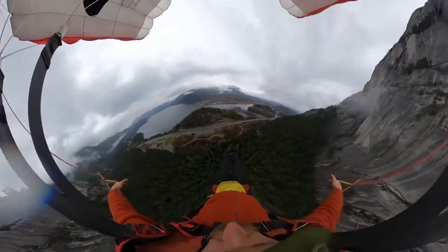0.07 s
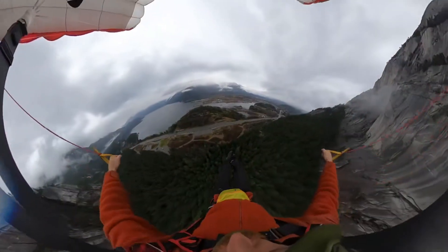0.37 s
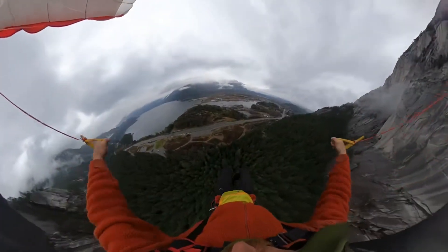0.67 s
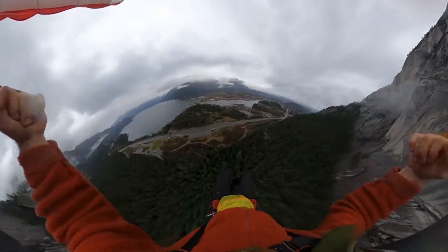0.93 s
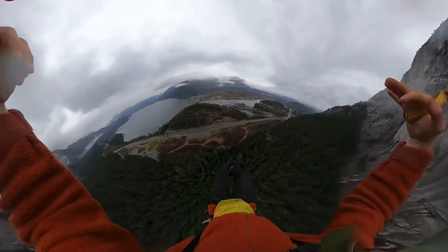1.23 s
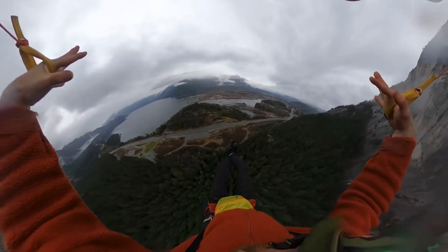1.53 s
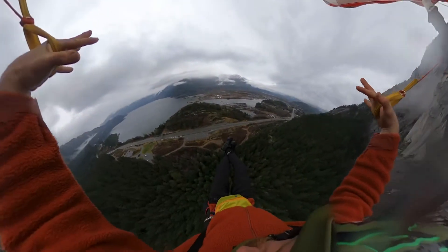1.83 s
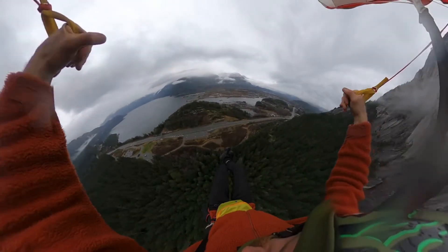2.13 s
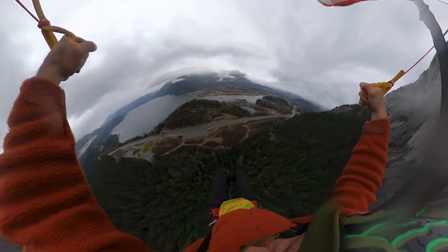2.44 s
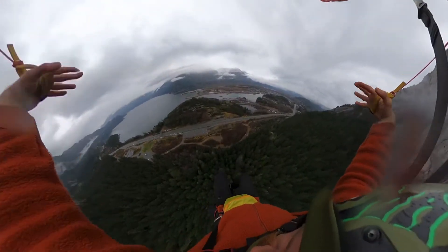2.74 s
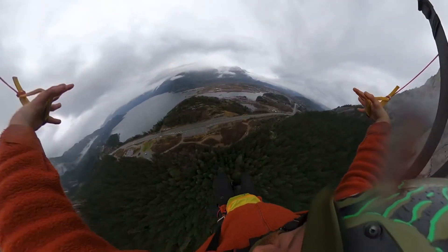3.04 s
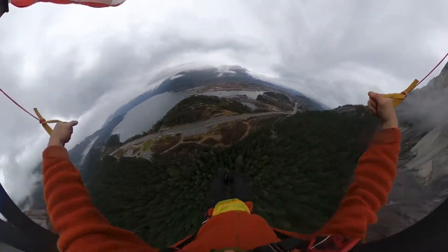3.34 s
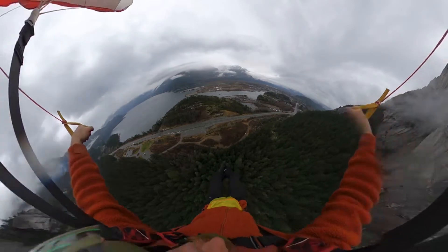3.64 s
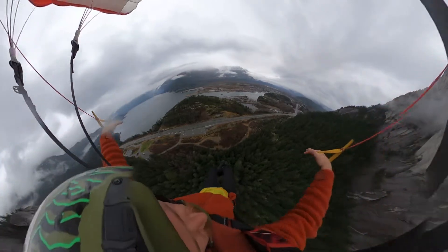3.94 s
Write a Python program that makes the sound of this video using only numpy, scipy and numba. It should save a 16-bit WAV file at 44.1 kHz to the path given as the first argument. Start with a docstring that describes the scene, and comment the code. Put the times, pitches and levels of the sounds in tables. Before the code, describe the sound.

Wind buffets a body-worn microphone throughout a parachute glide, a low, uneven rumble with soft thumps and rushing, hissing air. From about 1.1 to 1.5 seconds, sleeves and steering lines rustle and snap lightly. The rush gradually builds. At about 3.7 seconds, a snap and a strong gust hit the microphone, the loudest moment, followed by faint, high, breathy whistling just before 4 seconds.

```python
"""Wind on a body-worn camera during a canopy glide beside a cliff.
From the start, eddies buffet the microphone and air rushes and hisses over the gear, with a faint
hollow ring at first. From 1.1 to 1.5 s, sleeves and steering toggles rustle and snap as the arms rise.
The rush builds; at 3.7 s a gust tears across the port, followed by high, breathy whistles."""
import sys
import numpy as np
from scipy import signal
from scipy.fft import rfft, irfft
from scipy.io import wavfile
from scipy.ndimage import uniform_filter1d
from numba import njit

SR = 44100
rng = np.random.default_rng(int(sys.argv[2]) if len(sys.argv) > 2 else 0)


def to_wav(sig):
    """Store sig (one row per channel, or 1-D mono) as 16-bit WAV at the path in sys.argv[1].

    Samples outside -1..1 are clipped; the rate is SR.
    """
    pcm = np.clip(np.atleast_2d(sig), -1, 1) * 32767
    pcm = np.round(pcm).astype(np.int16)
    wavfile.write(sys.argv[1], SR, pcm.T)  # frames by channels


N = 176400

# envelopes of mic buffeting, air rush, treble hiss: t/s, level/dB
BUFFET_DB = [(0, -28.5), (.11, -28), (.25, -33), (.6, -33.5), (.68, -35), (.82, -33.5), (1.0, -34),
             (1.09, -29.5), (1.17, -34.5), (1.25, -27), (1.33, -31), (1.48, -26), (1.68, -26.5),
             (1.78, -30.5), (1.86, -28.5), (2.17, -30.5), (2.44, -27.5), (2.49, -27.5), (2.55, -22.5),
             (2.66, -25.5), (2.92, -28), (3.1, -25), (3.28, -29), (3.45, -29), (3.55, -26), (3.63, -29),
             (3.74, -18), (3.86, -23), (3.91, -13), (4, -17.5)]
RUSH_DB = [(0, -52), (.35, -56.5), (.7, -52.5), (1.0, -48.5), (1.35, -45.5), (1.58, -47), (1.7, -44.5),
           (2.0, -45), (2.7, -43.5), (3.4, -43.5), (3.66, -40.5), (3.85, -35.5), (3.9, -39), (4, -38)]
HISS_DB = [(.11, -83), (.17, -71.5), (.75, -73), (1.2, -69.5), (1.6, -67), (2.02, -61), (2.2, -64.5),
           (2.32, -69.5), (2.6, -63), (2.8, -63.5), (2.97, -68), (3.2, -60.5), (3.5, -63.5), (3.66, -61.5),
           (3.78, -53), (3.88, -58.5), (4, -56)]
# source noise spectra: f/Hz, relative density/dB
BUFFET_SPECTRUM = [(10, -6), (28, 1), (48, 0.5), (70, -3), (115, -3), (200, -2), (600, 3.5)]
RUSH_SPECTRUM = [(80, -5.5), (200, 5.5), (330, 0.5), (550, -1), (760, -3.5), (1050, -5), (1600, -12),
                 (2200, -19.5), (3500, -33.5), (8000, -63.5), (12000, -77)]
HISS_SPECTRUM = [(900, 0), (2000, 1.5), (2800, 2.5), (3600, -1.5), (4500, -2.5), (6500, -9), (8500, -17),
                 (12000, -27), (15500, -50.5)]
TICK_SPECTRUM = [(3500, 0), (6000, -3), (10000, -13), (13000, -28)]
SLEEVE_SPECTRUM = [(150, 3), (380, 26.5), (900, -5), (1800, 1), (3800, -13.5), (6000, -15), (10000, -29),
                   (15000, -50)]
GUST_SPECTRUM = [(50, -12), (200, 5), (420, -0.5), (700, -5), (1000, -8.5), (1450, -15.5), (2000, -28),
                 (4000, -42), (9000, -60), (15000, -66)]
# air over lines and gear: t/s, half length/s, f/Hz, width/Hz, level/dB
GEAR_WHISTLES = [(0.31, 0.17, 546, 140, -61.5), (0.48, 0.14, 1150, 210, -61.5), (0.2, 0.5, 1770, 210, -71),
                 (0.089, 0.24, 2870, 750, -73.5), (.03, .1, 4100, 3900, -69),
                 (3.94, 0.078, 2730, 1400, -53.5), (3.94, 0.12, 4320, 1300, -55.5),
                 (3.95, 0.089, 6400, 1400, -67.5)]
# single large eddies: t/s, peak/dB, f/Hz, half length/s
EDDY_THUMPS = [(0.015, -22, 61, 0.03), (0.462, -22, 89, 0.0064), (.793, -23, 70, 0.003),
               (1.058, -24, 58, 0.0079), (1.497, -23.5, 57, 0.01), (2.422, -19, 60.5, 0.014),
               (2.742, -30, 88, 0.026), (3.553, -18, 59, 0.014), (3.778, -15, 395, 0.0022),
               (3.812, -14.5, 215, 0.0053)]
# cloth and line snaps: t/s, peak/dB, f/Hz, width/oct, lag of lows/cycles, tick level/dB before a 0.5 gain
TAUT_SNAPS = [(.1262, -46.5, 850, 1, 2.4, -64), (1.2945, -40, 480, 1.15, 2.4, -58),
              (1.376, -31, 640, .85, 2.2, -51), (1.415, -33.5, 900, .95, 1.2, -49),
              (1.4628, -30.5, 700, .8, 2.3, -56), (3.7028, -16.5, 580, .55, 1.6, -62)]
# steering line slips: t/s, level/dB, f/Hz
LINE_SCRAPES = [(1.1355, -67, 5300), (1.2315, -60.5, 3950), (1.2495, -62.5, 3850), (1.274, -60.5, 4000)]
# sleeve rubs: t/s, half length/s, level/dB
SLEEVE_RUSTLES = [(1.284, 0.045, -46), (1.438, 0.066, -50.5)]
# gust blasts: onset/s, pre-filter level/dB, attack/s, decay/s, initial cut-off above floor/Hz
GUST_BLASTS = [(3.675, -36.5, 0.039, .022, 3980), (3.717, -20, 0.047, 0.015, 4200),
               (3.77, -19.5, 0.024, .022, 398), (3.813, -25.5, 0.0086, 0.037, 3400)]


def undb(db):
    """Decibels to gain."""
    return 10 ** (np.asarray(db) / 20)


def unit(x):
    """Scale to rms 1."""
    return x / np.sqrt(np.mean(x ** 2))


def seconds():
    """Sample times."""
    return np.arange(N) / SR


def freqs():
    """Bin frequencies, 1 Hz minimum."""
    return np.maximum(np.arange(N // 2 + 1) * SR / N, 1)


def curve(rows):
    """Gain along t/s, level/dB points."""
    return undb(np.interp(seconds(), *np.array(rows).T))


def swell(at_s, half_s):
    """Gaussian envelope, 1/e at +-half_s."""
    return np.exp(-((seconds() - at_s) / half_s) ** 2)


def walk(rate_hz):
    """Random sample-and-hold, smoothed twice, rms 1."""
    hold = max(int(SR / rate_hz), 2)
    held = np.repeat(rng.standard_normal(N // hold + 1), hold)
    return unit(uniform_filter1d(uniform_filter1d(held, hold), hold)[:N])


def noise(spectrum):
    """Noise shaped by f/Hz, density/dB points, rms 1."""
    hz, db = np.array(spectrum).T
    gain = undb(np.interp(np.log(freqs()), np.log(hz), db))
    return unit(irfft(rfft(rng.standard_normal(N)) * gain, N))


def ring(hz, width_hz):
    """Noise in one steep-sided resonance, rms 1."""
    f = freqs()
    detune = (f / hz - hz / f) * hz / width_hz
    return unit(irfft(rfft(rng.standard_normal(N)) / (1 + .5 * detune ** 2) ** 2, N))


@njit
def lowpass(x, cutoff_hz):
    """Two-pole low-pass, moving cut-off."""
    y, band_state, low_state = np.empty(len(x)), 0., 0.
    for i in range(len(x)):
        g = np.tan(np.pi * cutoff_hz[i] / SR)
        band = (band_state + g * (x[i] - low_state)) / (1 + g * (g + 1.2))
        y[i] = low_state + g * band
        band_state, low_state = 2 * band - band_state, 2 * y[i] - low_state
    return y


def buffeting(cruise_edge_hz=129.9, cruise_db=-40.5, oct_per_db=.04, shove_s=.09, flutter_db=1.5):
    """Large eddies shove the microphone unevenly; brighter in faster air."""
    shift_oct = oct_per_db * (20 * np.log10(curve(RUSH_DB)) - cruise_db)
    edge_hz = cruise_edge_hz * 2 ** shift_oct
    shoves = lowpass(lowpass(noise(BUFFET_SPECTRUM), edge_hz), edge_hz)
    levelled = shoves / np.sqrt(uniform_filter1d(shoves ** 2, int(shove_s * SR)))
    return unit(levelled * undb(flutter_db * walk(rate_hz=28.08))) * curve(BUFFET_DB)


def eddies(flow, depth_db, rate_hz):
    """Each octave of a flow flickers independently."""
    spectrum, octave = rfft(flow), np.log2(freqs())
    bands = (irfft(spectrum * np.maximum(1 - abs(octave - k), 0), N) for k in range(3, 15))
    return unit(sum(band * undb(-depth_db * walk(rate_hz)) for band in bands))


def airstream(rush_flutter_db=.34, hiss_flutter_db=1.1):
    """Small eddies rush and hiss with a common flutter."""
    flutter = walk(rate_hz=70)
    flow = eddies(noise(RUSH_SPECTRUM), depth_db=1.57, rate_hz=21.58)
    rush = flow * undb(rush_flutter_db * flutter) * curve(RUSH_DB)
    hiss = noise(HISS_SPECTRUM) * undb(hiss_flutter_db * flutter) * curve(HISS_DB)
    return rush + hiss


def whistles():
    """Broad resonances, sounding while air meets the gear at the right angle."""
    return sum(undb(db) * ring(hz, width_hz) * np.exp(-((seconds() - at_s) / half_s) ** 4)
               for at_s, half_s, hz, width_hz, db in GEAR_WHISTLES)


def thumps():
    """Each large eddy briefly swings the pressure at the microphone."""
    phases = rng.uniform(0, 2 * np.pi, len(EDDY_THUMPS))
    return sum(undb(db) * swell(at_s, half_s) * np.cos(2 * np.pi * hz * (seconds() - at_s) + phase)
               for (at_s, db, hz, half_s), phase in zip(EDDY_THUMPS, phases))


def snaps(scuff_db=-12, decay_s=.003):
    """Cloth and line flick taut: dry tick, then pulse and scuff, lows last."""
    f, out, grit = freqs(), np.zeros(N), noise(TICK_SPECTRUM)
    for at_s, db, hz, width_oct, lag_cycles, tick_db in TAUT_SNAPS:
        magnitude = np.exp(-.5 * (np.log2(f / hz) / width_oct) ** 2)
        band = magnitude * np.exp(-2j * np.pi * lag_cycles * np.log(f / hz))  # delay = lag_cycles / f
        pulse = irfft(band * np.exp(-2j * np.pi * f * at_s), N)
        pulse /= abs(pulse).max()
        age_s = seconds() - at_s
        tail = (age_s > 0) * np.exp(-abs(age_s) / decay_s)
        rub = rng.standard_normal(N) * tail
        scuff = irfft(band * rfft(rub), N) / np.sqrt(np.mean(magnitude ** 2))
        tick = .5 * grit * tail
        out += undb(db) * (pulse + undb(scuff_db) * scuff) + undb(tick_db) * tick
    return out


def scrapes(half_s=.002, width_hz=1300):
    """The steering line slips in short, thin rasps."""
    return sum(undb(db) * swell(at_s, half_s) * ring(hz, width_hz) for at_s, db, hz in LINE_SCRAPES)


def sleeves(grain_db=4):
    """Cloth rubs in grainy swells."""
    envelope = sum(undb(db) * swell(at_s, half_s) for at_s, half_s, db in SLEEVE_RUSTLES)
    return unit(noise(SLEEVE_SPECTRUM) * undb(-grain_db * walk(rate_hz=600))) * envelope


def gust(floor_hz=335, fall_s=.037):
    """Blasts hit the port; eddies grow, so each darkens to a thud."""
    out = np.zeros(N)
    for at_s, db, attack_s, decay_s, excess_hz in GUST_BLASTS:
        age_s = np.maximum(seconds() - at_s, 0)
        rise = np.minimum(age_s / attack_s, 1)
        decay = np.exp(-np.maximum(age_s - attack_s, 0) / decay_s)
        cutoff_hz = floor_hz + excess_hz * np.exp(-age_s / fall_s)
        out += undb(db) * rise * decay * lowpass(noise(GUST_SPECTRUM), cutoff_hz)
    return out


def scene():
    """All sources at one microphone."""
    mix = buffeting() + airstream() + whistles() + thumps() + snaps() + scrapes() + sleeves() + gust()
    return mix[None]


def record(dry, fade_s=.004, top_hz=15400):
    """Fade in and out; the camera cuts the top."""
    t = seconds()
    fade = np.minimum(np.minimum(t, t[::-1]) / fade_s, 1)
    return signal.sosfilt(signal.ellip(8, .2, 70, top_hz, fs=SR, output="sos"), dry * fade)


dry = scene()
out = record(dry)
to_wav(out)
```